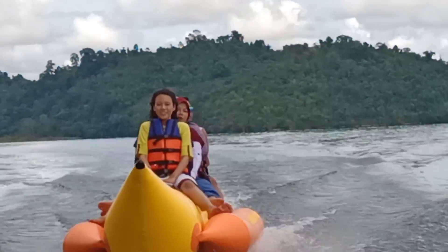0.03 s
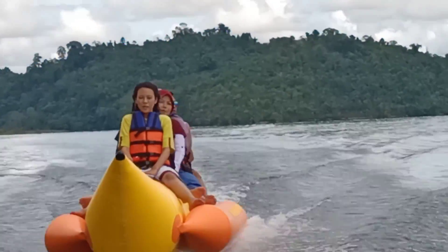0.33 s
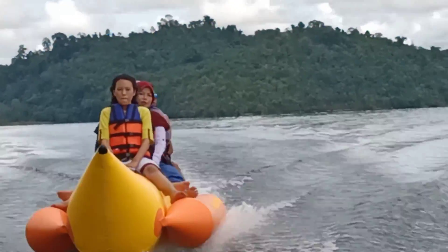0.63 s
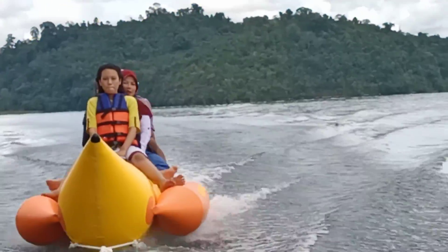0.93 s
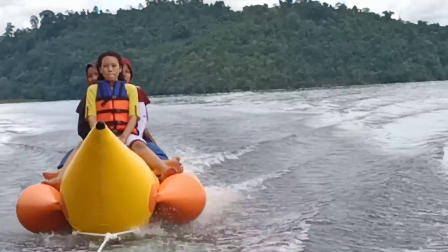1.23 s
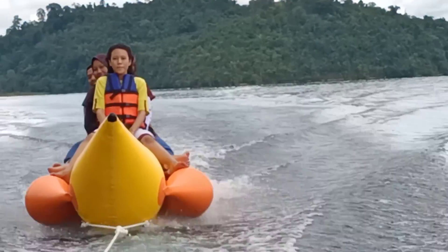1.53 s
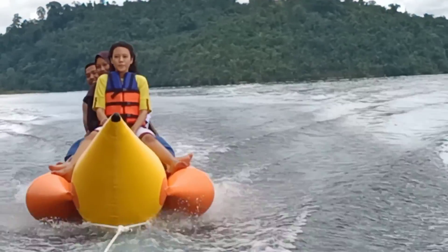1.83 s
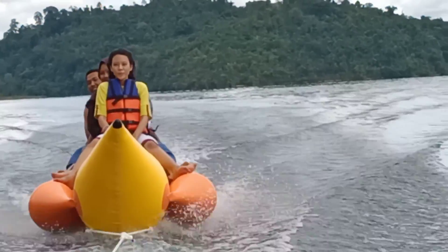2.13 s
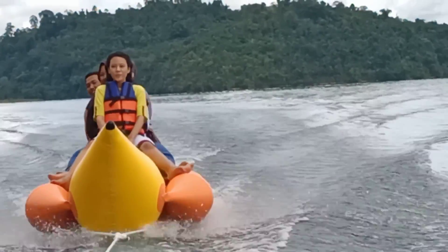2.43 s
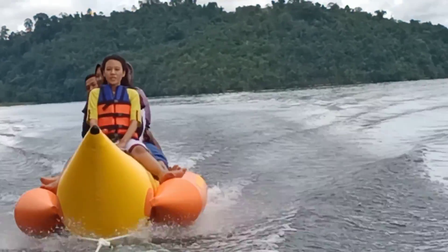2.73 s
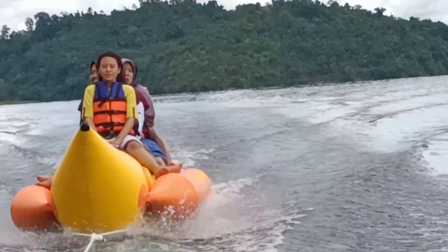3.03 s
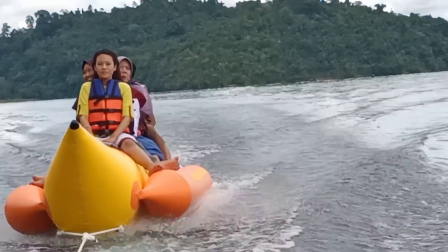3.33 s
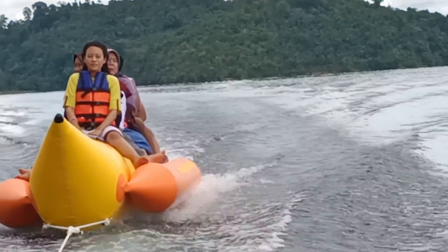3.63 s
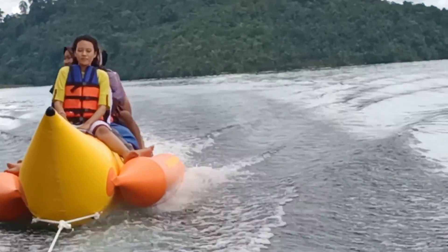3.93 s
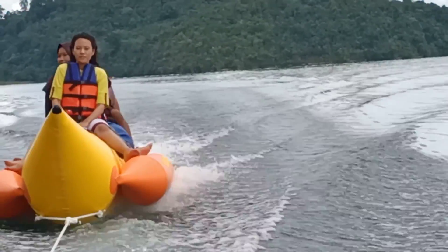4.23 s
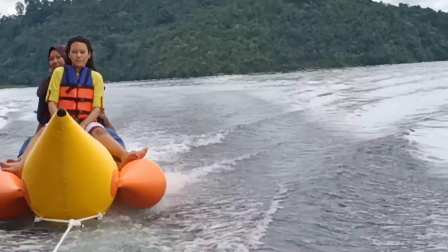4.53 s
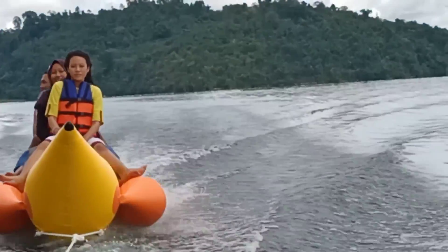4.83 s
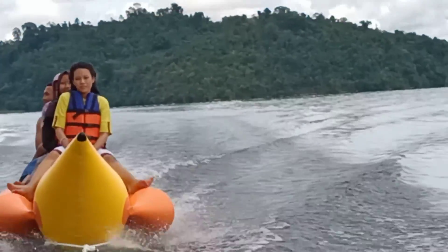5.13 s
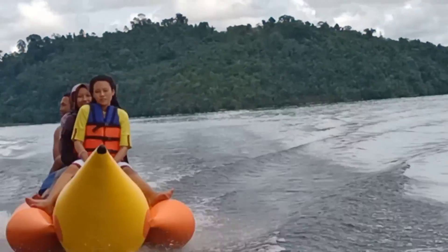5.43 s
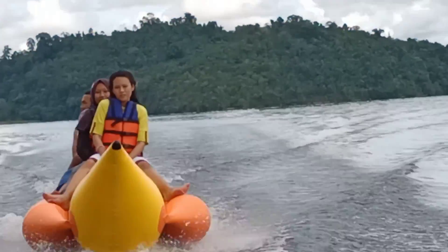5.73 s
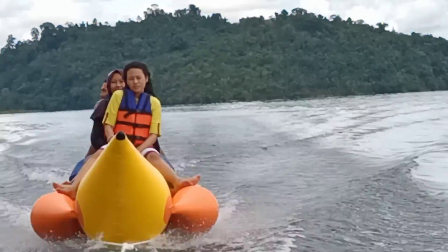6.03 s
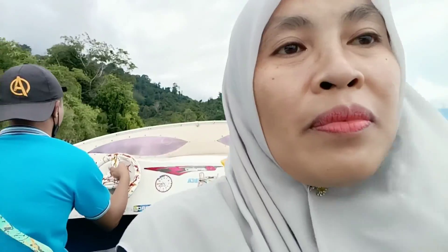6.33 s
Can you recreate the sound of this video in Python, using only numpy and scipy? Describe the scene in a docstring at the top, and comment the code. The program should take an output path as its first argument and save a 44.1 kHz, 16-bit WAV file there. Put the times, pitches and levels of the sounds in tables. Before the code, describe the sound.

A motorboat's outboard engine drones at steady throttle, with a buzzing, raspy edge, as it tows an inflatable across a lake. Wind rumbles, thumps and snaps on the microphone aboard, mostly on the left. Behind the boat the wake hisses, swelling with small surges of spray. Near the end the left side turns brighter, then everything stops abruptly.

```python
"""An outboard motor drones at steady throttle, heard from a boat towing an inflatable over a lake.
Its periodic firing gives a harmonic series, a casing buzz and a pulsed rasp. Turbulence in the head wind
rumbles, thumps and snaps on two microphone ports, mostly the left; the wake hisses and surges behind.
Near the end the left side brightens, then the sound stops abruptly."""
import sys
import numpy as np
from scipy.fft import rfft, irfft, next_fast_len
from scipy.io import wavfile
from scipy.ndimage import uniform_filter1d, minimum_filter1d, map_coordinates

SR = 44100
rng = np.random.default_rng(int(sys.argv[2]) if len(sys.argv) > 2 else 0)


def dump_mix(stems):
    """Bounce the given channels to the path in sys.argv[1] as a 16-bit WAV at rate SR."""
    frames = np.atleast_2d(stems).T  # one column per channel
    limited = np.clip(frames, -1, 1)  # hard clip at full scale
    pcm = np.round(limited * 32767).astype(np.int16)
    wavfile.write(sys.argv[1], SR, pcm)


N = 290619
TIME_S = np.arange(N) / SR
STOP_S = 6.027


def amp(db):
    """Amplitude ratio of a level in decibels."""
    return 10 ** (np.asarray(db) / 20)


def unit(x):
    """Normalisation to rms 1."""
    return x / np.sqrt(np.mean(x ** 2) + 1e-20)


def wobble(rate_hz):
    """Slow random modulation: a spline through rate_hz Gaussian knots a second."""
    knots = rng.standard_normal(2048)
    coarse = np.arange(0, N + 32, 32)
    return np.interp(np.arange(N), coarse, map_coordinates(knots, [coarse * rate_hz / SR], mode='wrap'))


def wobble_pair(rate_hz):
    """Independent modulation for each port."""
    return np.array([wobble(rate_hz), wobble(rate_hz)])


def at_time(points, time_s):
    """Linear interpolation of (time_s, value) points."""
    return np.interp(time_s, *np.transpose(points))


def at_frequency(points, hz):
    """Interpolation of (frequency_hz, value) points on a logarithmic axis."""
    point_hz, values = np.transpose(points)
    return np.interp(np.log(hz + 1), np.log(point_hz + 1), values)


def filtered(x, response):
    """Linear filtering: the spectrum of x times a frequency response."""
    size = next_fast_len(N + 8192)
    return irfft(rfft(x, size) * response(np.fft.rfftfreq(size, 1 / SR)), size)[..., :N]


def coloured(x, spectrum):
    """Spectral shaping by (frequency_hz, gain_db) points."""
    return filtered(x, lambda hz: amp(at_frequency(spectrum, hz)))


def noise(spectrum):
    """Coloured noise of rms 1, incoherent between the ports."""
    return unit(coloured(rng.standard_normal((2, N)), spectrum))


def add(out, centre_s, port, sound):
    """Superposition of a transient on one port (0 left, 1 right)."""
    at = round(centre_s * SR) - len(sound) // 2 + np.arange(len(sound))
    inside = (at >= 0) & (at < N)
    out[int(port), at[inside]] += sound[inside]


# Spectrum of the foam: frequency_hz, density_db
FOAM_SPECTRUM = [(300, -1), (1500, 0), (3000, -0.5), (4000, 0), (6500, 1), (8700, -1.5), (9800, -5),
                 (11300, -3.5), (13000, -7.5), (14600, -12.5), (15500, -23)]
# Hiss between surges, left row then right: level_db
WAKE_LEVELS = [
    [-38],
    [-37],
]
# Spray thrown up as the inflatable meets a wave: centre_s, rise_db, half_width_s
SPRAY_SURGES = [(0.28, 1.2, .07), (1.02, 3.5, .22), (1.45, 1, .22), (2.07, 1.3, .12), (2.33, 2.5, .09),
                (2.75, 3, .1), (3.09, 4, .12), (3.55, 1, .22), (4.32, 0.7, .12), (4.85, 3, .16),
                (5.25, 2.5, .09), (5.72, 1, .25)]

def wake(fizz_db):
    """Foam and falling spray sum incoherently to a hiss, surging with waves and grainy with droplets."""
    surge_db = sum(rise_db * np.exp(-((TIME_S - centre_s) / half_width_s) ** 2)
                   for centre_s, rise_db, half_width_s in SPRAY_SURGES)
    level_db = np.array(WAKE_LEVELS) + surge_db + 0.94 * wobble(22) + 0.4 * wobble_pair(13)
    droplets = unit(amp(fizz_db * wobble_pair(300)))
    return amp(level_db) * droplets * noise(FOAM_SPECTRUM)


# Roughness of the head wind: time_s, roughness_db
AIR_ROUGHNESS = [(0, -6.5), (.3, 0), (.7, -6), (.9, -0.5), (1.3, 0), (1.6, 0.5), (1.9, 0.5), (2.45, -2),
                 (2.9, 5), (3.08, -2), (3.3, 1), (3.55, 1.5), (3.9, -1.5), (4.3, -0.5), (4.56, -3.5),
                 (5.0, 0.5), (5.35, -3), (6.0, 0.5)]
# Wind on each port, left row then right: mean_db, gust_depth_db
PORT_EXPOSURE = [(-15, 2), (-17.5, 4.2)]
# Spectrum of the eddies: frequency_hz, density_db
EDDY_SPECTRUM = [(12, -31), (35, -4.5), (100, -4), (180, 1.5), (300, -4), (480, -3.5), (700, -13),
                 (1200, -20), (2000, -28.5), (3000, -31.5), (5000, -42)]
# Spectrum of tearing air: frequency_hz, density_db
CRACKLE_SPECTRUM = [(60, -11), (200, 7), (500, 13.5), (750, 0), (1200, 6.5), (1700, -3), (2700, -2),
                    (3700, -16.5), (4600, -11), (5600, -23), (9000, -39)]

def wind(eddy_depth_db, tear_depth_db, gusts_per_s):
    """Turbulent pressure: gusts roll eddies over each port; in rough air the strongest tear and crackle."""
    rough_db = at_time(AIR_ROUGHNESS, TIME_S)
    gusts = amp([mean_db + depth_db * np.tanh(wobble(gusts_per_s)) for mean_db, depth_db in PORT_EXPOSURE])
    eddies = wobble_pair(55)
    rumble = amp(-0.5 + 0.3 * rough_db) * unit(amp(eddy_depth_db * eddies)) * noise(EDDY_SPECTRUM)
    fine_eddies = 0.73 * wobble_pair(260)
    tearing = unit(amp(tear_depth_db * np.tanh((eddies + fine_eddies) / 2)))
    crackle = amp([[-15], [-17.5]]) * amp(0.6 * rough_db) * tearing * noise(CRACKLE_SPECTRUM)
    return gusts * (rumble + crackle)


# Impacts of the heaviest eddies: centre_s, relative_db, half_width_s, centre_hz, port
LARGE_EDDIES = [(0.199, -11.5, 0.018, 487, 1), (0.319, -9, 0.015, 520, 1), (0.693, -12, 0.0089, 437, 1),
                (2.425, -9.5, 0.0048, 520, 1), (2.561, -9, 0.005, 480, 0), (2.935, -13, 0.026, 38, 1),
                (3.316, -14, 0.015, 480, 0), (3.938, -8.5, 0.011, 476, 1), (4.636, -9, 0.0025, 400, 0),
                (5.025, -12.5, 0.014, 437, 1)]

def buffets(half_band_octaves):
    """The pressure pulse of a large eddy thumps one port: a burst of band-limited noise."""
    out = np.zeros((2, N))
    t = np.arange(-4096, 4096) / SR
    hz = np.fft.rfftfreq(len(t), 1 / SR)
    for centre_s, relative_db, half_width_s, centre_hz, port in LARGE_EDDIES:
        passband = np.exp(-(np.log2((hz + 1) / centre_hz) / half_band_octaves) ** 2)
        band = irfft(rfft(rng.standard_normal(len(t))) * passband)
        swell = np.exp(-(t / half_width_s) ** 2)
        thump = unit(swell * band) * np.sqrt(np.mean(swell ** 2))
        add(out, centre_s, port, amp(relative_db - 1) * thump)
    return out


def weak_snap_rows(per_s, right_share):
    """Intermittency: rows like STRONG_SNAPS, one at random in each time slot, stronger in rough air."""
    strength, tone = rng.standard_normal((2, 256))
    jitter, side = rng.random((2, 256))
    centre_s = (np.arange(len(jitter)) + jitter) / per_s
    relative_db = -18 + 1.3 * strength + at_time(AIR_ROUGHNESS, centre_s)
    treble_tilt_db = -10 + 2 * tone
    rows = zip(centre_s, relative_db, treble_tilt_db, side < right_share)
    return [row for row in rows if row[0] < STOP_S]


# The loudest snaps of air: centre_s, relative_db, treble_tilt_db, port
STRONG_SNAPS = [(0.04, -14.5, 0, 0), (0.41, -11, -2.5, 0), (0.643, -11, -11, 0), (0.677, -5, -5.5, 0),
                (0.754, -20, 1, 0), (1.411, -15, 0.5, 0), (1.439, -17.5, 6, 0), (1.459, -11, 1.5, 0),
                (1.571, -9, -14, 0), (2.007, -14, 2, 0), (2.181, -15, 1, 0), (2.404, -12.5, -5.5, 0),
                (2.43, -12.5, -9.5, 1), (2.454, -12.5, -0.5, 0), (2.496, -7, -1.5, 0), (2.751, -13, -3, 0),
                (2.784, -13, -3, 0), (2.938, -11, -1, 1), (3.266, -13, -11, 0), (3.441, -11.5, -12, 0),
                (3.727, -11.5, -9.5, 0), (3.767, -10.5, -4, 0), (3.832, -13.5, -4, 0), (3.849, -11, -1, 0),
                (3.917, -8, -6, 0), (3.939, -15.5, 0, 0), (3.976, -7, -12.5, 1), (4.027, -16, -3, 0),
                (4.059, -13, -0.5, 0), (4.15, -15, -4, 0), (4.283, -16, -3.5, 0), (4.322, -11, -23, 1),
                (4.426, -7, -15.5, 0), (4.471, -13.5, -6, 0), (4.523, -17.5, 5, 0), (4.707, -4, -5, 0),
                (4.744, -13, -3.5, 0), (4.862, -14.5, 1, 0), (4.991, -4, -15, 0), (5.014, -11, -4, 0),
                (5.086, -6, -15, 0), (5.186, -14.5, 5.5, 0), (5.99, -10.5, -3, 0)]
# Spectrum of a snap: frequency_hz, density_db
SNAP_SPECTRUM = [(100, -6.5), (400, 14), (800, 4), (1200, 3.5), (1700, 0.5), (2700, 2.5), (3700, -6),
                 (4600, -9.5), (5600, -16), (9000, -36.5)]

def snaps(flurry_db):
    """Flow separation: air breaks away from a port in one crisp snap amid a ragged flurry."""
    out = np.zeros((2, N))
    t = np.arange(-2048, 2048) / SR
    hz = np.fft.rfftfreq(len(t), 1 / SR)
    treble_shelf = at_frequency([(1300, 0), (3500, 0.94)], hz)
    weak_snaps = weak_snap_rows(per_s=17, right_share=0.29)  # the left port is windward
    for centre_s, relative_db, treble_tilt_db, port in STRONG_SNAPS + weak_snaps:
        core = unit(np.exp(-(t / 0.0015) ** 2) * rng.standard_normal(len(t)))
        ragged = amp(6 * np.interp(t, t[::48], rng.standard_normal(len(t[::48]))))
        flurry = unit(np.exp(-(t / 0.011) ** 2) * ragged * rng.standard_normal(len(t)))
        colour = amp(at_frequency(SNAP_SPECTRUM, hz) + treble_tilt_db * treble_shelf)
        snap = unit(irfft(rfft(core + amp(flurry_db) * flurry) * colour))
        add(out, centre_s, port, amp(relative_db - 12) * snap)
    return out


# Spectrum of gas rush and clatter: frequency_hz, density_db
RASP_SPECTRUM = [(60, -27.5), (180, 3.5), (480, 8), (700, -14), (1050, -9.5), (1400, -25), (1900, -16),
                 (2500, -11), (3100, -16.5), (3800, -35), (8000, -50.5)]

def rasp(firings, depth_db):
    """Amplitude modulation: gas rush and clatter swell once per firing."""
    puffs = unit(amp(depth_db * np.cos(2 * np.pi * firings)))
    return puffs * noise(RASP_SPECTRUM)


FIRING_HZ = 82.7
# Spectral envelope of the engine casing: frequency_hz, relative_db
CASING_SPECTRUM = [(500, -40), (640, -5), (1200, -6), (1600, 7), (2000, -6.5), (2250, -5.5), (2500, 3.5),
                   (2800, -13), (3050, -3.5), (3500, -14.5), (5000, -24), (9000, -45)]

def casing_buzz(firings, waver_db, scatter_db):
    """Interference: reflections in the boat give each casing harmonic its own level and phase per port."""
    out = np.zeros((2, N))
    for order in np.arange(14, 42):
        casing_db = at_frequency(CASING_SPECTRUM, order * FIRING_HZ)
        level_db = casing_db + scatter_db * rng.standard_normal((2, 1)) + waver_db * wobble(8.9)
        out += amp(level_db) * np.cos(2 * np.pi * (order * firings + rng.random((2, 1))))
    return unit(out)


# Partials of exhaust and hull: nominal_firing_multiple, left_db, right_db
ENGINE_ORDERS = [(1, -30, -27.5), (1.5, -26.5, -33), (2, -20.5, -23.5), (2.5, -36, -47), (3, -23, -22.5),
                 (4, -21, -19.5), (5, -39, -32), (5.5, -36, -39), (6, -22.5, -25.5), (7, -43.5, -45),
                 (9, -42, -43), (10, -55.5, -41), (11, -48, -33.5), (12, -47.5, -38.5), (13, -35, -33.5),
                 (14, -50.5, -56), (15, -57, -45.5), (17, -49.5, -55), (19, -53.5, -48.5), (23, -52.5, -55),
                 (27, -51, -46), (30, -48, -49), (37.2, -54.5, -53.5)]

def drone(firings, waver_db, sway_db):
    """Periodic forcing: exhaust and hull sound harmonics of the shaft rate; moving air makes each waver."""
    out = np.zeros((2, N))
    for multiple, left_db, right_db in ENGINE_ORDERS:
        order = round(2 * multiple) / 2  # whole cycles per shaft turn, at two firings a turn
        phase = 2 * np.pi * order * firings + np.pi / 4  # each firing is a push followed by a suck
        hull_lag = 0.075 * order ** 2  # dispersion: the hull delays high orders
        port_lag = 0.028 * order * np.array([[1], [-1]])  # the right port hears first
        level_db = np.array([[left_db], [right_db]]) + waver_db * wobble(12) + sway_db * wobble_pair(8.8)
        out += np.sqrt(2) * amp(level_db) * np.cos(phase - hull_lag - port_lag)
    return out


def outboard_motor():
    """Phase locking: one crankshaft, slightly uneven in speed, times the rasp, buzz and drone."""
    speed = 1 + 0.0005 * wobble(2) + 0.0013 * wobble(18)
    firings = np.cumsum(FIRING_HZ * speed) / SR
    gas_rush = amp(-29.5) * rasp(firings, depth_db=6.5)
    buzz = amp([[-37.5], [-37]]) * casing_buzz(firings, waver_db=2.5, scatter_db=5.0)
    return drone(firings, waver_db=1.34, sway_db=0.33) + buzz + gas_rush


# Course of the brightening on the left: time_s, bright_fraction
BRIGHT_BLEND = [(5.3, 0), (5.5, 0.65), (5.78, 0.9), (5.9, 0.54), (6.03, 0.5)]
# Response of the left side when fully bright: frequency_hz, gain_db
BRIGHT_RESPONSE = [(700, 0.5), (1000, 3), (1400, 2), (2000, 9.5), (2500, 12), (3200, -1), (4500, -1),
                   (7000, 1.5), (8000, 10), (8700, 14), (9800, 6), (13000, 1)]

def scene():
    """Superposition: motor and wake from the stern, brightening late on the left, and wind at the ports."""
    left, right = outboard_motor() + wake(fizz_db=1.14)
    left = left + at_time(BRIGHT_BLEND, TIME_S) * (coloured(left, BRIGHT_RESPONSE) - left)
    transients = snaps(flurry_db=-3.0) + buffets(half_band_octaves=1.06)
    head_wind = wind(eddy_depth_db=3.0, tear_depth_db=15.5, gusts_per_s=12)
    return np.array([left, right]) + head_wind + transients


def limited(x, ceiling, hold_s):
    """Peak limiting: each channel's gain dips briefly around peaks over the ceiling."""
    size = int(hold_s * SR)
    gain = np.minimum(1, ceiling / (np.abs(x) + 1e-9))
    return x * uniform_filter1d(minimum_filter1d(gain, size, axis=1), size, axis=1)


def record(dry):
    """Peak limiting, an abrupt stop and a steep low-pass filter."""
    held = limited(dry, ceiling=0.94, hold_s=0.008)
    stop_db = np.interp(TIME_S - STOP_S, [-.012, -.003, .003, .018, .035, .4], [0, -4, -27, -38, -70, -120])
    cutoff_hz = 15300
    return filtered(held * amp(stop_db), lambda hz: 1 / (1 + (hz / cutoff_hz) ** 160))


dry = scene()
out = record(dry)
dump_mix(out)
```